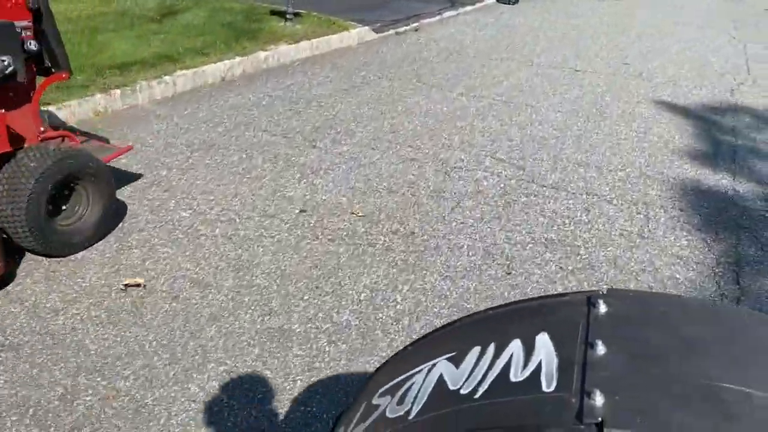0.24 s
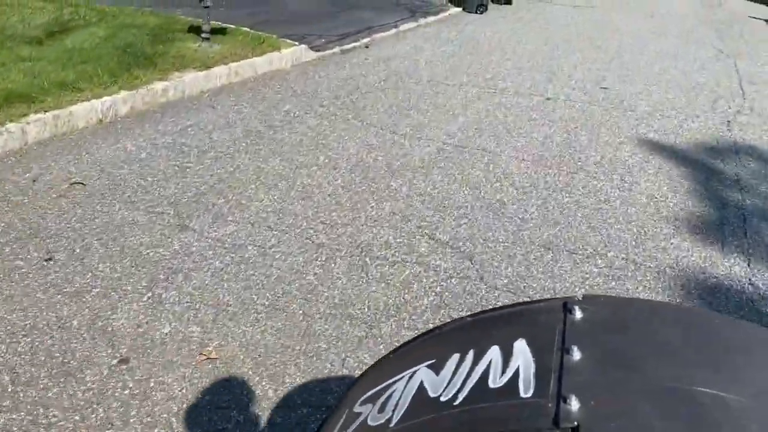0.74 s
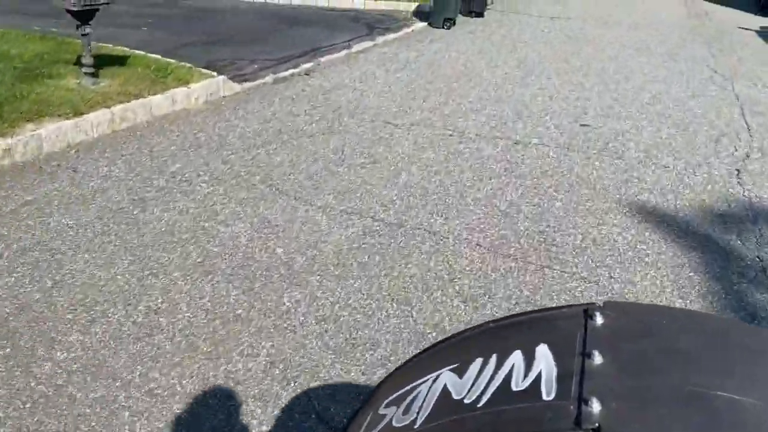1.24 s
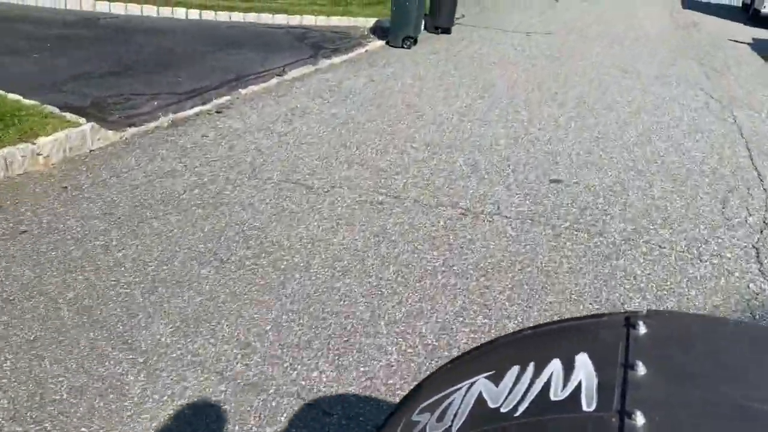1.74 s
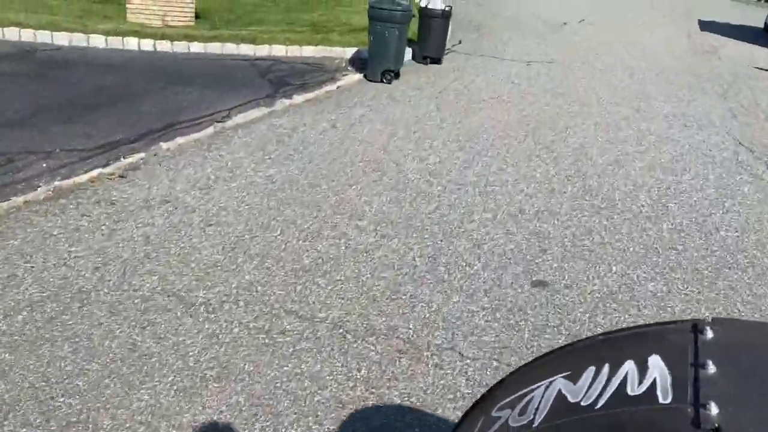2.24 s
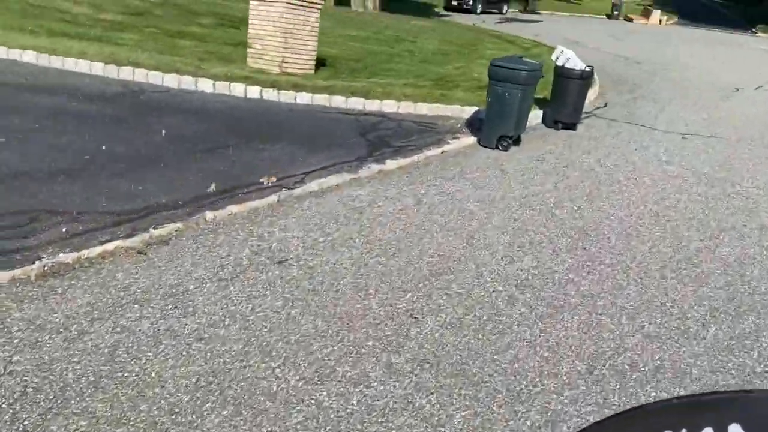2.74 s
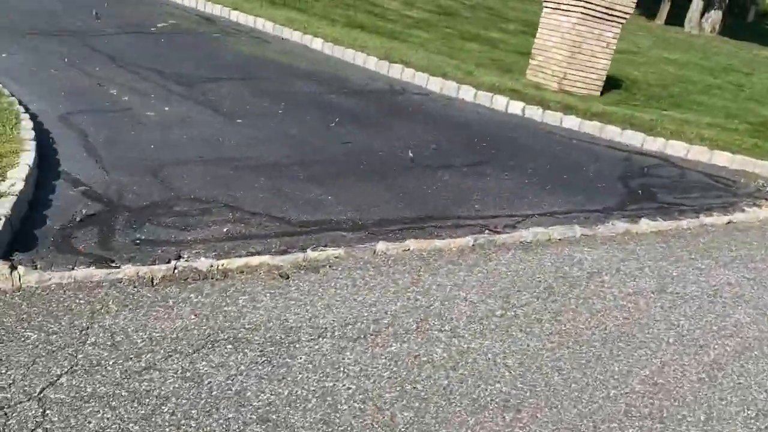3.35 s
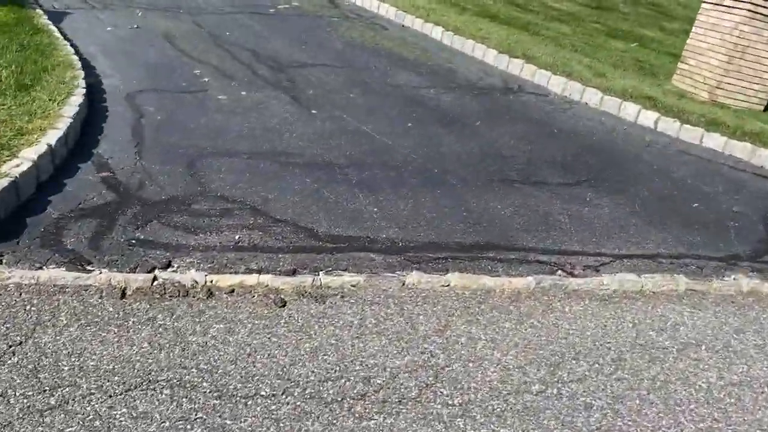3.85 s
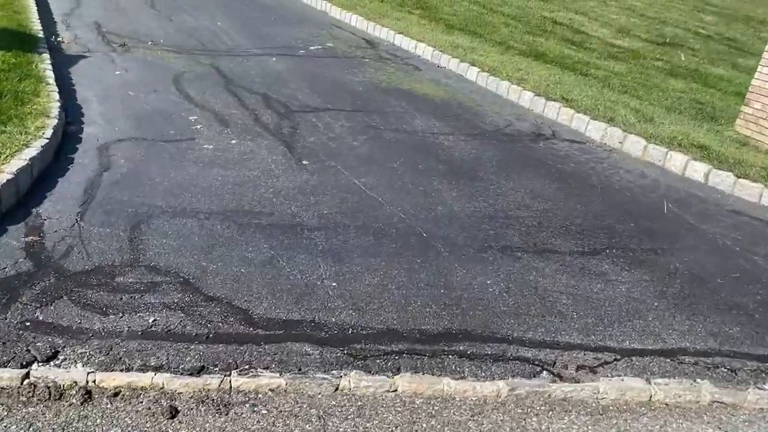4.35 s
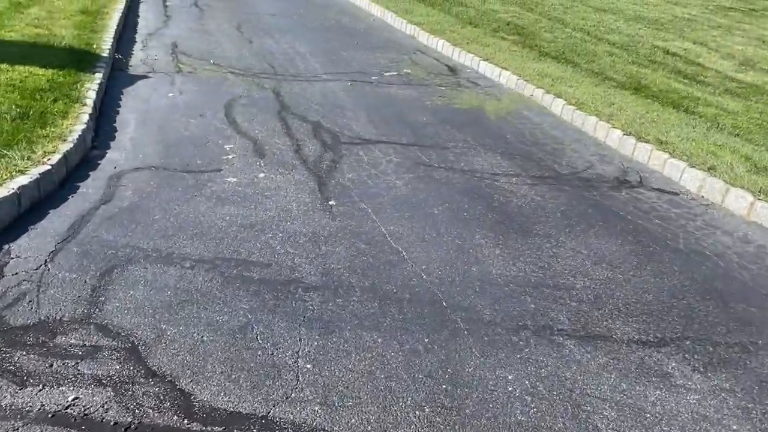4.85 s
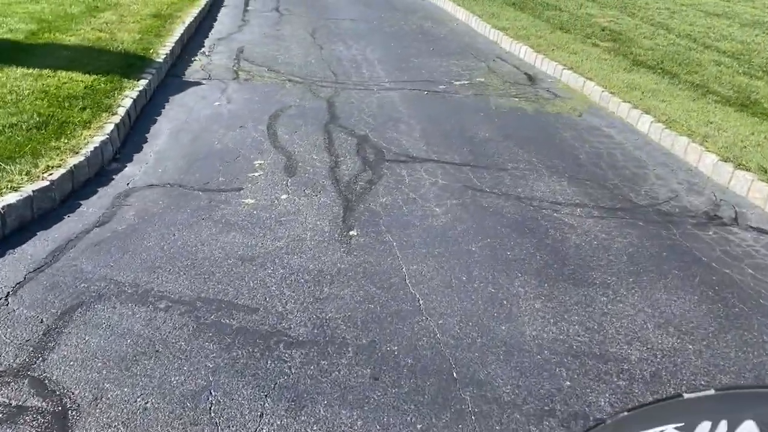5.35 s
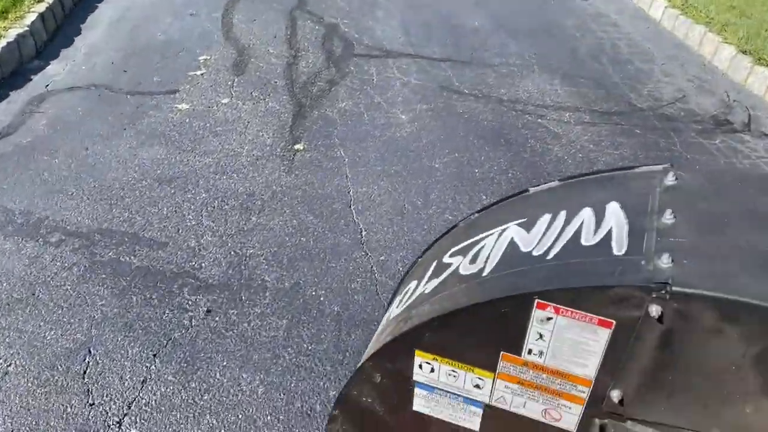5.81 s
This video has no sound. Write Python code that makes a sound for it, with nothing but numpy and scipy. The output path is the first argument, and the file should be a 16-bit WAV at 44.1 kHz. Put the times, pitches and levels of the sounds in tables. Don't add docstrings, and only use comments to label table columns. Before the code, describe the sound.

A big ride-on petrol blower is already at full speed and never slows. A steady low-mid fan hum with buzzing overtones sits over a broad roar of air, with a rapid two-cylinder throb, hissing exhaust puffs and a thin pump whine. The tone shifts as the listener turns away, then leans back over the housing. Low rumbles mark pavement bumps. Close stereo pickup from the rider's place, outdoors, with no obvious echo.

```python
import sys
import numpy as np
from scipy import signal
from scipy.fft import rfft, irfft, next_fast_len
from scipy.io import wavfile
from scipy.ndimage import uniform_filter1d

SR = 44100
rng = np.random.default_rng(int(sys.argv[2]) if len(sys.argv) > 2 else 0)


def magnitude_from_level(level_db):
    exponent = np.asarray(level_db, float) / 20
    return 10 ** exponent


def master(y):
    cut = np.clip(np.atleast_2d(y).T, -1, 1)
    pcm = np.round(cut * 32767)
    wavfile.write(sys.argv[1], SR, pcm.astype(np.int16))


N = 268128
STEP = 256
BELT = 11.445

# time in seconds, blades passing in Hz.
FAN_SPEED = [(0, 315), (.4, 314.7), (.65, 315.1), (1.15, 314.2), (1.65, 315), (2.1, 314.5), (2.4, 316),
             (2.65, 317.6), (2.9, 317.5), (3.4, 316.3), (3.65, 315.9), (4.15, 315.6), (4.5, 316.3),
             (4.9, 316.6), (5.15, 316.4), (5.65, 316.8), (6.08, 316.2)]


def evened(x):
    return x / np.sqrt(np.mean(x ** 2) + 1e-20)


def curve(rows, t):
    s, *columns = np.transpose(rows)
    return [np.interp(t, s, c) for c in columns]


def spectrum(rows, hz):
    f, value = np.transpose(rows)
    return np.interp(np.log(hz + 1), np.log(f + 1), value)


def spread(values, step):
    return np.interp(np.arange(N) / step, np.arange(len(values)), values)


def drift(rate, step):
    steps = next_fast_len(N // step + 2)
    shape = 1 / (1 + (np.fft.rfftfreq(steps, step / SR) / rate) ** 4)
    wander = irfft(rfft(rng.standard_normal(steps)) * shape, steps)
    return evened(wander)[:N // step + 2]


def grid():
    return np.fft.rfftfreq(2048, 1 / SR)[:, None], np.arange(N // 512 + 5) * 512 / SR


def noise(db_per_hz, patchy_db):
    bins, frames = db_per_hz.shape
    a, b, c, d, patches = rng.standard_normal((frames, bins, 5)).T
    patches = uniform_filter1d(patches, size=10, axis=0)
    patches = evened(uniform_filter1d(patches, size=6, axis=1))
    z = np.array([a + 1j * b, c + 1j * d]) * magnitude_from_level(db_per_hz + patchy_db * patches)
    level = np.sqrt(SR / 2 * 3 / 2 / 1024 / 2)
    return level * signal.istft(z, nperseg=2048, noverlap=1536)[1][:, :N]


def tone(turns, db, waver_db, rate):
    phase = 2 * np.pi * turns + spread(waver_db / 9 * drift(rate, STEP), STEP)
    loudness = np.sqrt(2) * magnitude_from_level(db + waver_db * drift(rate, STEP))
    return spread(loudness, STEP) * np.cos(phase)


def facing(t):
    # time in seconds, heading (0 facing the housing, 1 side-on, 2 turned away).
    turning = [(0, 0.11), (1.0, 0.18), (2.0, 0.25), (2.3, 0.54), (2.55, 1.03), (3.15, 1.14), (3.45, 1.32),
               (3.7, 1.73), (4.15, 1.65), (4.5, 1.46), (4.95, 1.6), (5.25, 1.37), (5.5, 1.55), (6.08, 1.07)]
    lean_s, lean_length_s = 5.53, 0.22
    heading = curve(turning, t)[0]
    lean = np.clip((t - lean_s) / lean_length_s, 0, 1)
    away = np.clip(heading / 1.63, 0, 1) * (1 - lean)
    return heading, away, lean


def beam(heading, db):
    return np.interp(heading, range(len(db)), db)


def dulled(hz, lean):
    lean_hz, db_per_octave = 1290, -5
    return lean * db_per_octave * np.log2(max(hz / lean_hz, 1))


def panels(hz):
    # pitch in Hz, width in Hz, lift in dB.
    resonances = [(740, 136, 3), (3330, 94, 2.5), (4440, 89, 3), (4970, 96, 5), (5460, 105, 3),
                  (6800, 63, 3)]
    return sum(db / (1 + (2 * (hz - f) / width) ** 2) for f, width, db in resonances)


def fan_tones(t, blades, heading, lean):
    # multiple of the blade rate, level in dB facing, side-on, turned away.
    upper_tones = [(3, -40, -38, -57), (4, -37, -46.5, -47.5), (5, -30.5, -45.5, -51),
                   (6, -39, -37.5, -33.5), (7, -37, -37.5, -44), (8, -45.5, -55, -41.5), (9, -61, -43, -55),
                   (10, -53, -53, -65), (11, -55, -53, -52), (12, -64, -57, -47.5), (13, -54, -53, -54)]
    shade_from, shade_full = 0.92, 1.45
    shade = np.clip((heading - shade_from) / (shade_full - shade_from), lean, 1)
    sway_db = -0.6 + 0.53 * shade
    first_db = -17.5 - 7.5 * shade + sway_db * drift(10.3, STEP)
    total = tone(blades, first_db, waver_db=0.45, rate=21.0)
    total = total + tone(2 * blades, -27.5, waver_db=0.45, rate=5.0)
    for k, *db in upper_tones:
        smear = 0.1 * k ** 2
        level_db = beam(heading, db) + dulled(k * FAN_SPEED[0][1], lean) + .5
        total = total + tone(k * blades + smear, level_db, waver_db=1.1, rate=14.0)
    return total


def engine_throb(cycles, away):
    # multiple of the two-turn cycle, level in dB facing, turned away.
    orders = [(2, -31.5, -33.5), (3, -43.5, -39.5), (4, -40.5, -44), (5, -35.5, -41), (6, -35.5, -35.5),
              (7, -47, -58), (8, -40.5, -40.5), (9, -47, -44), (10, -43, -45), (11, -39.5, -43),
              (12, -43.5, -42.5), (13, -50, -56)]
    second_firing = .375
    total = np.zeros(N)
    for k, near, far in orders:
        both_firings = 1 + 0.77 * np.exp(-2j * np.pi * k * second_firing)
        muffler = -0.01135 * k ** 2
        turns = k * cycles + np.angle(both_firings) / (2 * np.pi) + muffler
        total = total + tone(turns, near + away * (far - near), waver_db=min(.12 * k, 1.1), rate=2.5)
    return total


def pump_whine(cycles, heading, lean):
    # multiple of the stroke rate, engine orders aside, level in dB facing, side-on, turned away.
    whines = [(1, 0, -56, -44, -58), (2, 0, -47, -37, -41), (2, 2, -54, -52, -58), (3, -1, -51, -56, -56),
              (3, 0, -48, -42, -45.5), (3, 1, -59, -47, -58), (3, 2, -65, -52, -45), (4, 0, -54, -56, -63),
              (4.5, 0, -72, -70, -55), (0, 70, -42.5, -54, -46)]
    strokes = 40.26
    pump_hz = strokes * FAN_SPEED[0][1] / BELT
    total = np.zeros(N)
    for k, aside, *db in whines:
        turns = (k * strokes + aside) * cycles + rng.random()
        level_db = beam(heading, db) + dulled(k * pump_hz, lean) + 1
        total = total + tone(turns, level_db, waver_db=1.2, rate=14.0)
    return total


def air_rush():
    # pitch in Hz, level in dB per Hz, facing the housing.
    near_colour = [(46, -88), (62, -62), (100, -56), (150, -52.5), (250, -53), (400, -56.5), (750, -57),
                   (1000, -58.5), (1700, -61), (2200, -58), (2800, -65.5), (4000, -70.5), (6500, -72.5),
                   (16000, -92)]
    # pitch in Hz, level in dB per Hz, turned away.
    away_colour = [(46, -76), (62, -58), (100, -59), (150, -50), (250, -55), (450, -60), (750, -58.5),
                   (1000, -60), (1700, -64), (2200, -58.5), (2800, -64.5), (4000, -70.5), (6500, -78.5),
                   (16000, -107.5)]
    hz, t = grid()
    away = facing(t)[1]
    colour_db = (1 - away) * spectrum(near_colour, hz) + away * spectrum(away_colour, hz)
    return noise(colour_db + panels(hz) + 0.15, patchy_db=0.9)


def exhaust_puffs(cycles):
    # pitch in Hz, level in dB per Hz.
    hiss_colour = [(800, -86.5), (2200, -67.5), (3350, -72), (4000, -74.5), (5000, -72), (6500, -75),
                   (8000, -78), (11000, -78.5), (13000, -77), (16000, -82)]
    puffs = [
        (.1, 1.23, 0.11),
        (.46, 1.45, 0.22),
        (.68, 0.33, 0.067),
    ]
    hz, frames = grid()
    strength = magnitude_from_level(1.1 * rng.standard_normal((int(cycles[-1]) + 3, len(puffs))))
    gate = 0.37 + np.zeros(N)
    for k, (place, size, decay) in enumerate(puffs):
        since = cycles + 1 - place
        gate = gate + size * strength[since.astype(int), k] * np.exp(-(since % 1) / decay)
    flutter = spread(magnitude_from_level(1.6 * drift(rate=180.0, step=32)), step=32)
    gate = uniform_filter1d(gate, size=280) * flutter
    away_db = 2.5 * facing(frames)[1] ** 2
    return evened(gate) * noise(spectrum(hiss_colour, hz) + panels(hz) + away_db, patchy_db=1.7)


def rumble(t):
    # time in seconds, rumble lift in dB, length in seconds.
    bumps = [
        (1.35, 6, .3),
        (3.9, 9, .4),
        (5.8, 13, .35),
    ]
    low_band = signal.butter(3, [70.0, 88.0], "band", fs=SR, output="sos")
    shake = signal.sosfilt(low_band, rng.standard_normal(N))
    level_db = -44 + sum(db * np.exp(-((t - s) / length) ** 2) for s, db, length in bumps)
    return spread(magnitude_from_level(level_db), STEP) * evened(shake)


def ports(direct, diffuse, away):
    # pitch in Hz, radians the right port lags when facing, when turned away.
    lag = [(0, 0, 0), (150, .01, .01), (320, .08, .2), (630, .15, .75), (900, .7, .7), (1400, .1, .4),
           (1750, .02, .25), (2000, .03, .2), (2400, .45, .45), (3000, .55, .5), (4200, .7, .9),
           (5000, .25, .6), (6000, 1.4, 1.6), (7250, np.pi, np.pi - .3), (8800, 4.8, 4.6),
           (10250, 2 * np.pi, 2 * np.pi), (13750, 3 * np.pi, 3 * np.pi - .1), (23000, 20, 20)]
    # pitch in Hz, likeness of the ports 0-1, left minus right in dB when facing, when turned away.
    likeness = [(150, 1.0, 0, 0), (320, 1.0, 1.3, .3), (630, .97, .4, 1.2), (720, .94, .8, 1.0),
                (920, .85, 4.5, 5.0), (1250, .74, 1.0, 1.0), (1750, .985, 0, -.6), (2000, .985, 0, -.6),
                (2800, .7, -1.0, 1.0), (5500, .86, .3, .5), (7400, .94, 0, 0), (8800, .8, 0, 0),
                (10300, .97, 0, 0), (11800, .8, 0, 0), (13700, .95, 0, 0), (15500, .65, 0, 0)]
    size = next_fast_len(N)
    hz = np.fft.rfftfreq(size, 1 / SR)
    same, *tilt_db = curve(likeness, hz)
    same = np.clip(same, 0, 1)
    tilt = magnitude_from_level(np.array(tilt_db) / 2)
    tones = rfft(direct, size)
    common, other = rfft(diffuse, size)
    left = tones + common
    right = tones + same * common + np.sqrt(1 - same ** 2) * other
    right = right * np.exp(-1j * np.array(curve(lag, hz)))
    near, far = irfft(np.stack([left * tilt, right / tilt], axis=1), size)[..., :N]
    return near + away * (far - near)


def scene():
    blades = np.cumsum(curve(FAN_SPEED, np.arange(N) / SR)[0]) / SR
    cycles = blades / BELT
    t = np.arange(N // STEP + 2) * STEP / SR
    heading, away, lean = facing(t)
    direct = fan_tones(t, blades, heading, lean) + engine_throb(cycles, away)
    direct = direct + pump_whine(cycles, heading, lean) + rumble(t)
    diffuse = air_rush() + exhaust_puffs(cycles + 0.33)
    return ports(direct, diffuse, spread(away, STEP))


def roll_off(x):
    return signal.sosfilt(signal.butter(12, 17100, fs=SR, output="sos"), x)


def record(dry):
    return roll_off(dry)


dry = scene()
out = record(dry)
master(out)
```